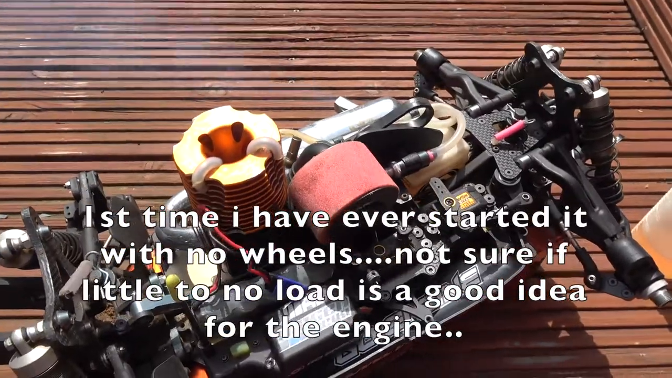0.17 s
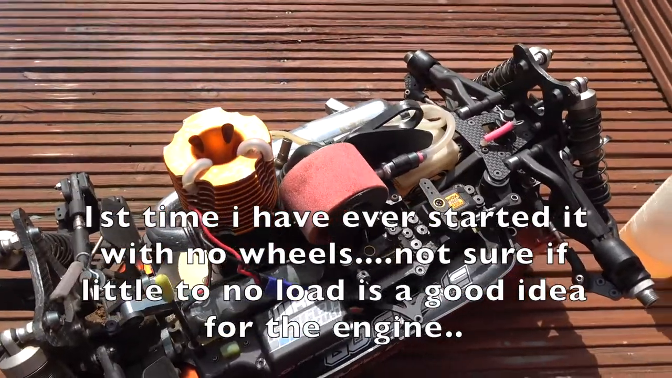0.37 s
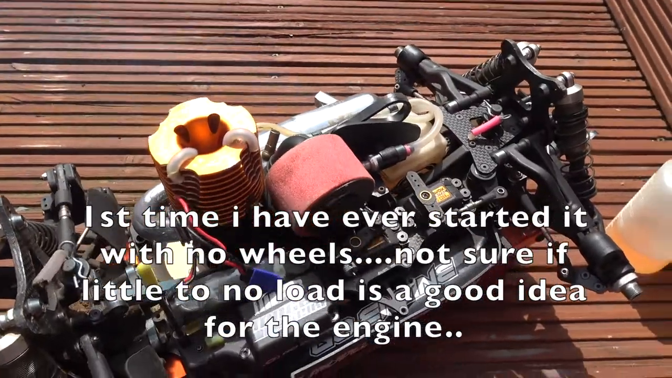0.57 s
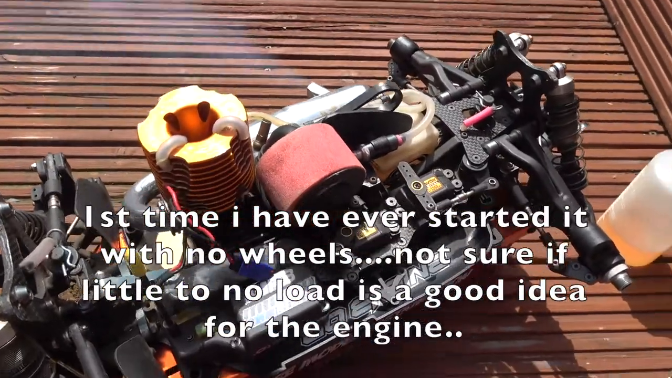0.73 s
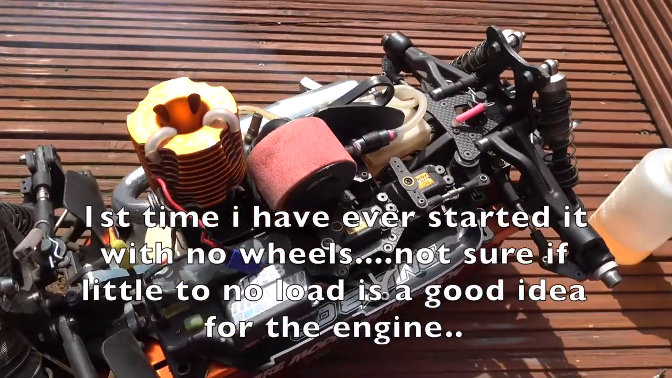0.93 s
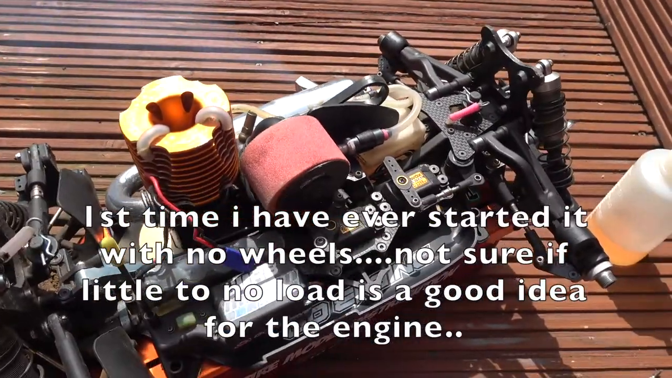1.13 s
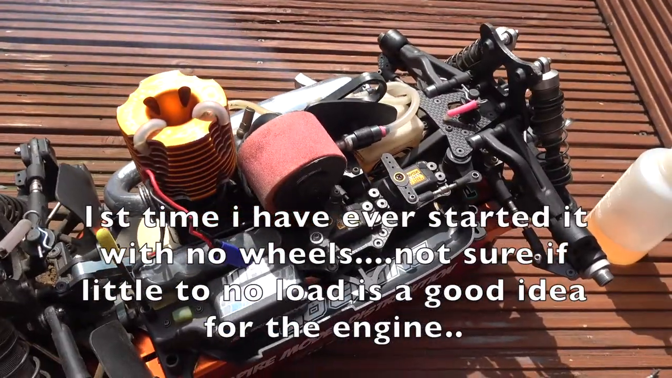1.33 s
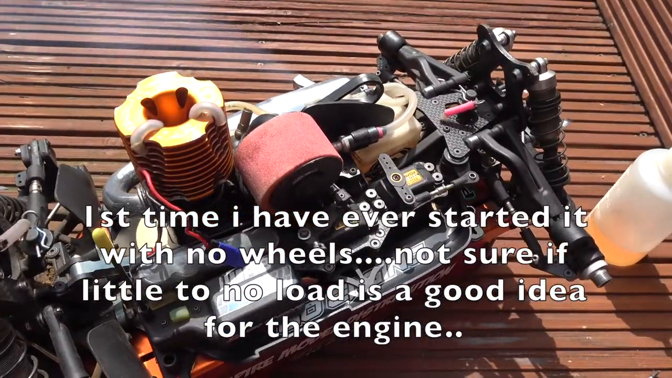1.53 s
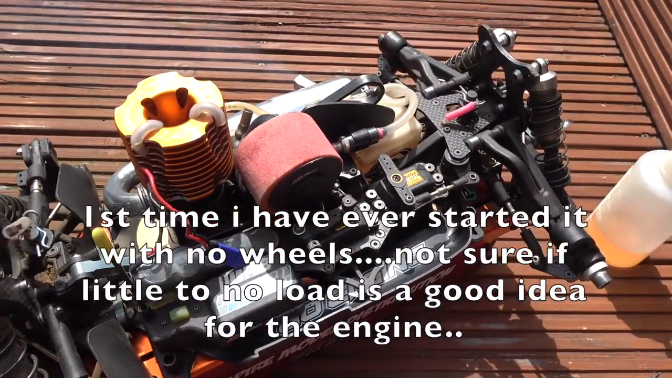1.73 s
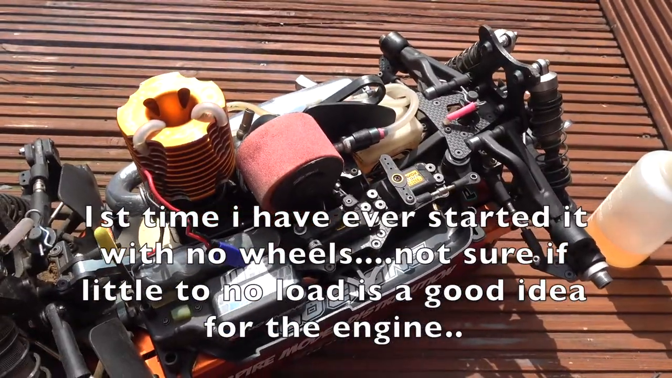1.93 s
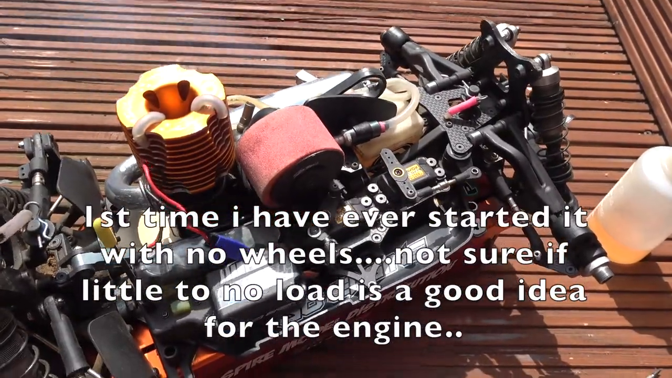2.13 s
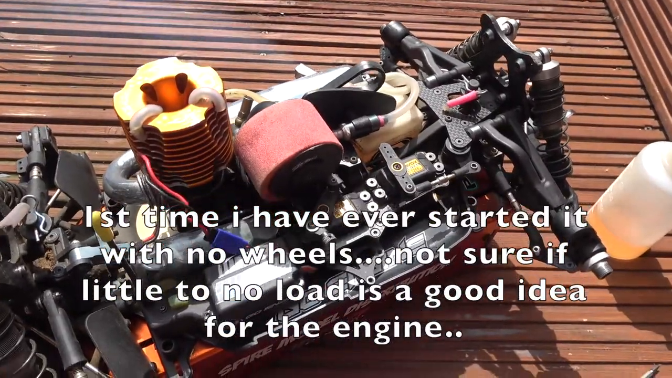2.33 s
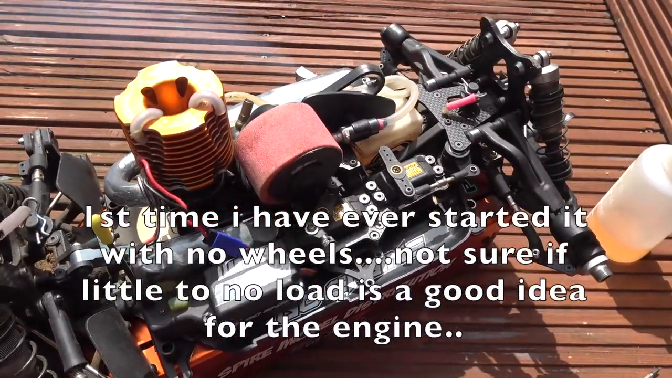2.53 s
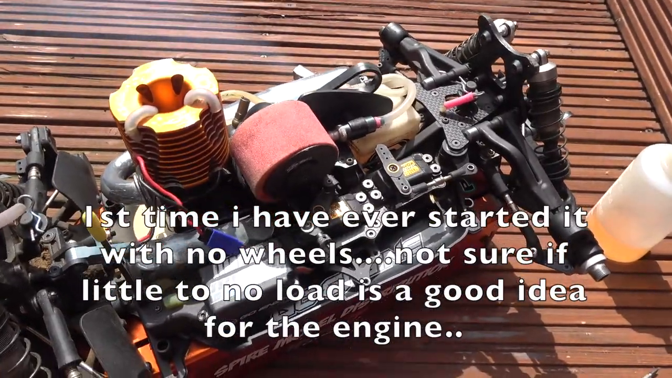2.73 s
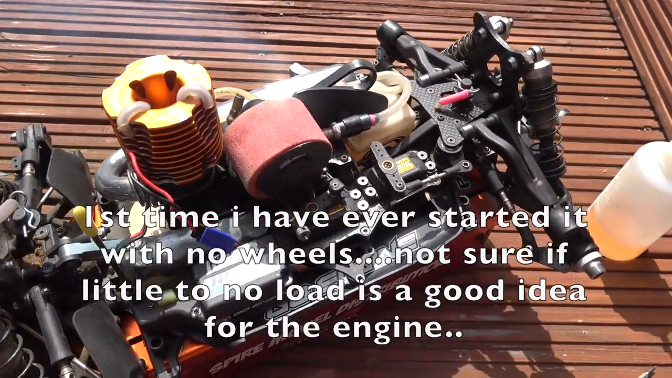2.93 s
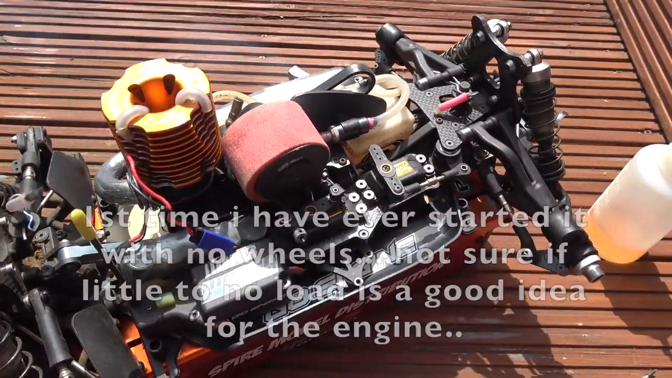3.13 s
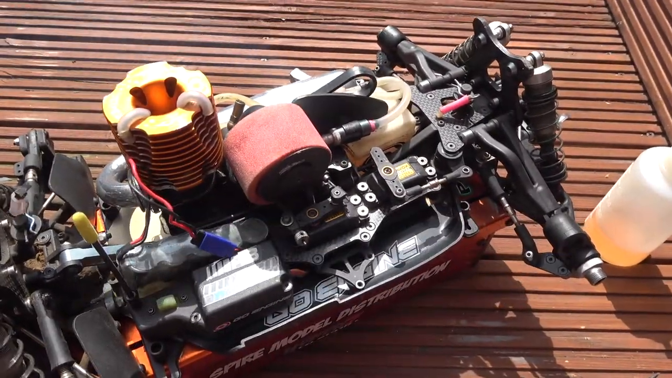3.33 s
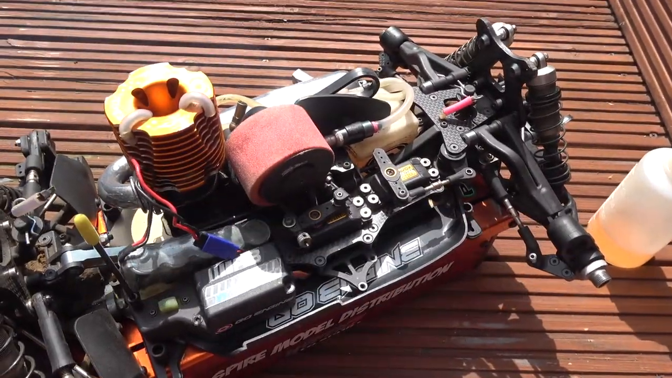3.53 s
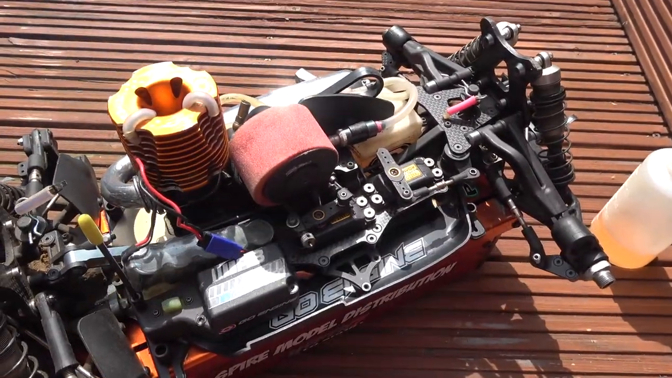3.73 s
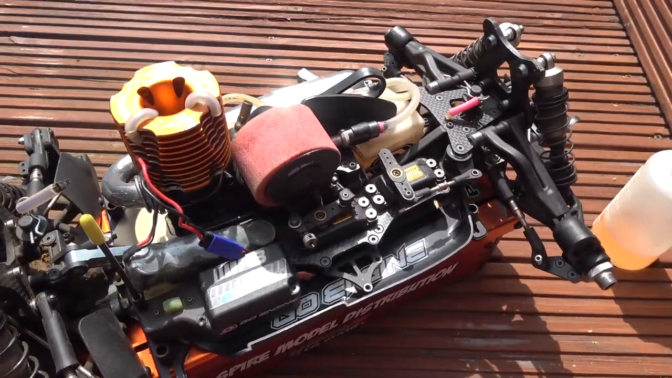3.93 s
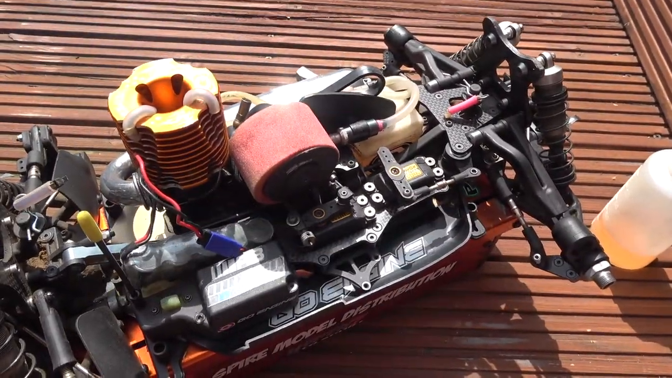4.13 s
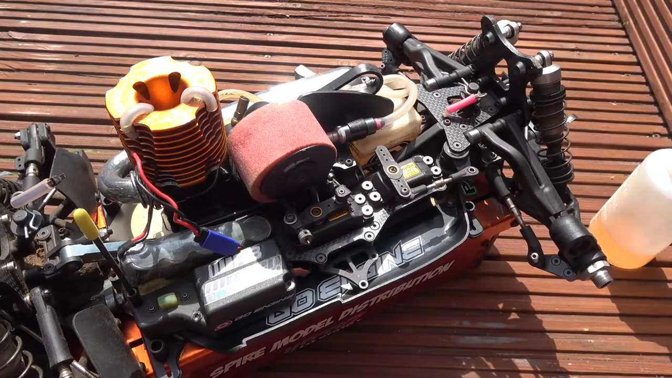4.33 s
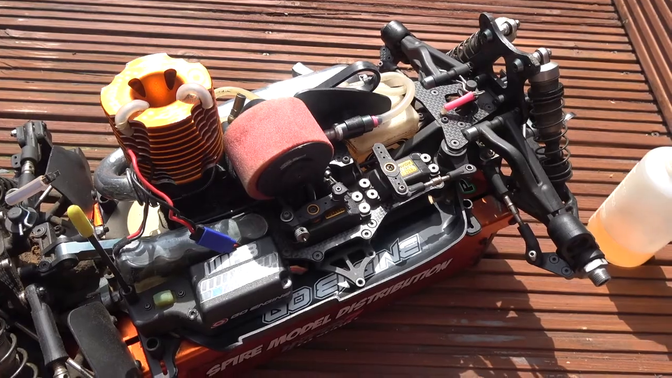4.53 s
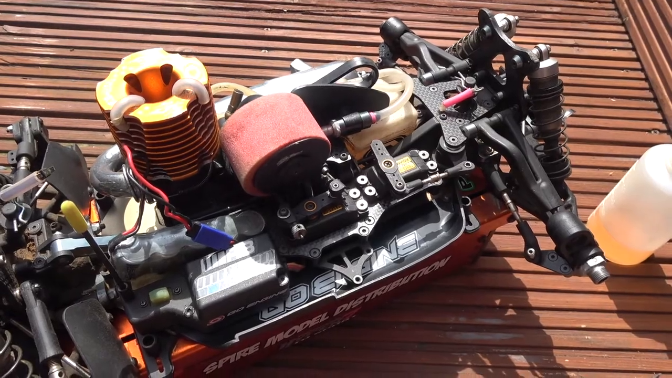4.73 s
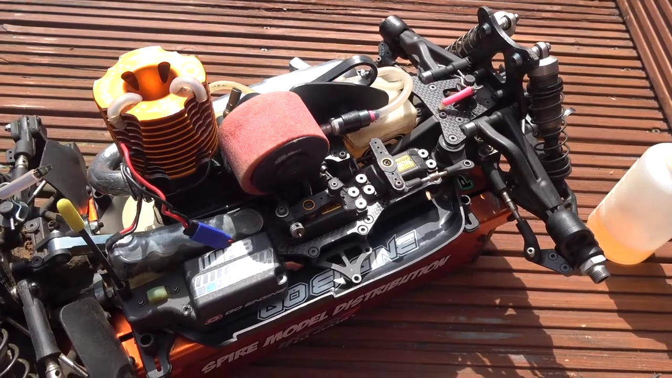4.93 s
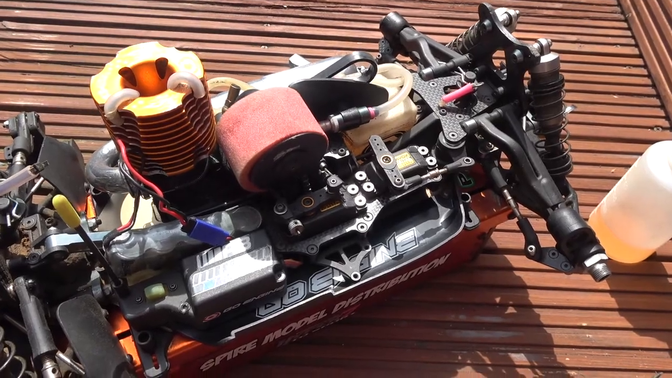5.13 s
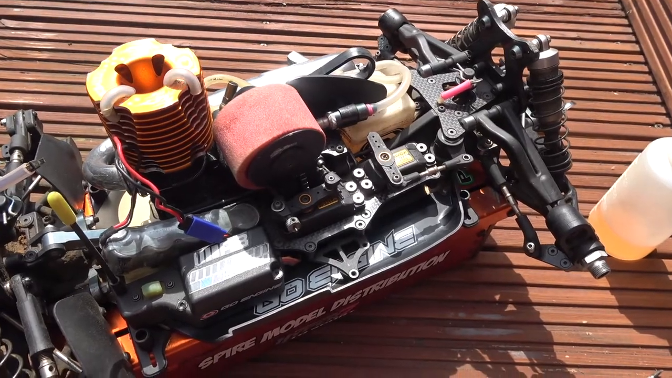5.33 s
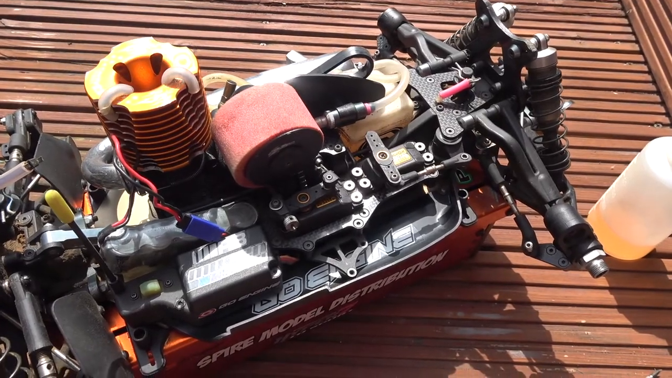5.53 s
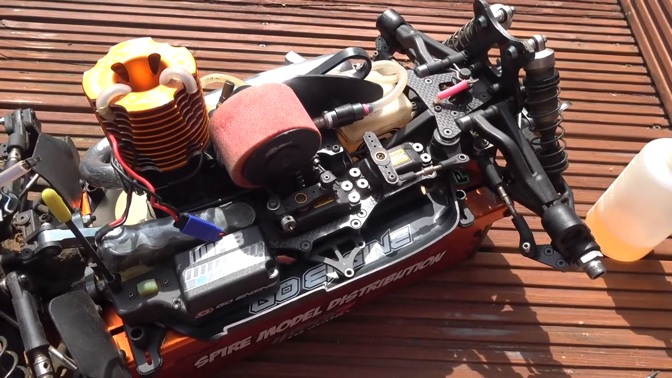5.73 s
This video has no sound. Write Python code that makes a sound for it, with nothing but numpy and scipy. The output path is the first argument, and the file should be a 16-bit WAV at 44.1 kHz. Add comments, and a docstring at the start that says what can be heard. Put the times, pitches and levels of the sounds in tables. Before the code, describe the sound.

Close to the microphone on a wooden deck, a tiny nitro engine in a model car drops from a high, buzzing scream. Twice more it is revved hard, held briefly and allowed to run down, while a loose part rattles lightly. For the last stretch it idles a little to the left, sputtering and crackling irregularly, with a faint high scrape from the clutch and a slight echo.

```python
"""A model buggy's two-stroke nitro engine screams close to a stereo microphone on a wooden deck.
It runs down, takes two more throttle bursts, then idles unevenly, a little to the left. Each crank turn
puffs through the silencer and rings the gas cavities; at speed every other turn is unlike the last.
A loose part rattles and the clutch scrapes; a short echo and a faint tail follow everything.
The microphone's gain control holds the bursts down and slowly lifts the idle."""
import sys
import numpy as np
from scipy import signal
from scipy.fft import rfft, irfft, next_fast_len
from scipy.io import wavfile
from scipy.ndimage import uniform_filter1d

SR = 44100
rng = np.random.default_rng(int(sys.argv[2]) if len(sys.argv) > 2 else 0)


def bounce(signal):
    """Save signal as a 16-bit WAV file at the path given by the first command-line argument."""
    frames = np.transpose(np.atleast_2d(signal))
    limited = np.clip(frames, -1, 1)
    pcm = np.round(limited * 32767).astype(np.int16)
    wavfile.write(sys.argv[1], SR, pcm)


N = 258867
T = np.arange(N) / SR

# the hardest firings at low speed: (time [s], extra ring [dB], extra crack [dB])
HARD_FIRINGS = [(0.6635, 10, 8), (2.126, -2, 12), (3.5916, 6, 6), (3.7142, 12.5, 4), (3.7885, 8, 4.5),
                (3.8359, 14, 5.5), (3.9932, 13.5, 4.5), (4.1916, 13, 0.5), (4.3170, 15, 6.5),
                (4.3539, 11, 3.5), (4.4181, 13, 4), (4.5041, 12.5, 2.5), (4.5916, 11, 2.5),
                (4.647, 11, 2.5), (4.6745, 12, 3.5), (4.7026, 13, 5.5), (4.7893, 14, 3), (4.9011, 11, 2),
                (4.928, 12, -1), (5.031, 10.5, 4), (5.0678, 15, -1), (5.187, 15, 1), (5.2238, 8, 1),
                (5.2427, 14, 3), (5.2704, 11.5, 5), (5.2972, 14, 6), (5.325, 13, 0), (5.3797, 14, 0),
                (5.4532, 14, 1.5), (5.5463, 14, 1), (5.609, 14, 1.5), (5.6457, 10, 1), (5.6831, 11, 4.5),
                (5.7369, 6, 0), (5.7555, 16, 4), (5.7908, 14.5, 2.5), (5.8556, 13.5, 1.5)]
# throttle bursts: (opens [s], closes [s], rattle of a loose part at full speed [dB])
THROTTLE_BURSTS = [(-0.6, 0.169, -26.5), (0.664, 1.594, -31), (2.116, 2.973, -40)]


def crank_speed(rise_s=0.078):
    """Turns per second: each burst shoots up from idle, holds near top speed and runs down again."""
    # crank speed with the throttle wide open: (time [s], speed [Hz])
    top_speed = [(0.02, 559), (0.18, 549.4), (0.85, 589.3), (1.03, 561.4), (1.384, 558.8), (1.418, 563.7),
                 (1.58, 560.4), (2.28, 595), (2.312, 588.4), (2.422, 570.6), (2.608, 559), (2.656, 583.3),
                 (2.74, 572), (2.96, 565.2)]
    # every burst runs down alike: (time since the throttle closed [s], speed [Hz])
    run_down = [(0, 568.5), (0.07, 492.4), (0.144, 350.2), (0.212, 279), (0.266, 235.5), (0.297, 202),
                (0.378, 152.7), (0.46, 118), (0.61, 91.5)]
    # crank speed at idle: (time [s], speed [Hz])
    idle_speed = [(3.55, 94.9), (4.29, 104.5), (4.34, 107.6), (4.46, 103.4), (5.18, 107.6), (5.86, 110.2)]
    idle, top = lookup(T, idle_speed), lookup(T, top_speed)
    hz = idle
    for opens, closes, _ in THROTTLE_BURSTS:
        rise = top - (top - idle) * np.exp(-(np.maximum(T - opens, 0) / rise_s) ** 2)
        fall = lookup(T - closes, run_down, left=np.inf)
        hz = np.maximum(hz, np.minimum(rise, fall))
    return hz


def crank(hz, waver=0.0022):
    """Crank angle in turns, and the whole turn on which each hard firing falls."""
    turns = np.cumsum(hz * (1 + waver * walk(60))) / SR
    hard_times = np.array(HARD_FIRINGS)[:, 0]
    free_turns = np.interp(hard_times, T, turns)
    turns_between = np.maximum(np.round(np.diff(free_turns)), 1)
    fired = np.round(free_turns[0]) + np.append(0, np.cumsum(turns_between))
    return turns + np.interp(T, hard_times, fired - free_turns), fired.astype(int)


def charges(turns, fired, hz, stumble_hz=137, spent_db=-2.5):
    """Time, ring strength and crack strength of every turn; at low speed the engine fires unevenly."""
    times = np.interp(np.arange(int(turns[-1]) + 1), turns, T)
    chance, jitter = rng.standard_normal((N // 50, 2))[:len(times)].T
    burn = unit(chance - .5 * np.roll(chance, 1))  # a good burn tends to be followed by a poor one
    uneven = np.interp(times, T, ramp(stumble_hz - hz, 20))
    ring_db = uneven * (6 + 2 * burn) + .5 * jitter
    crack_db = uneven * (-1.8 + 2.2 * burn) + 0.29 * jitter
    ring_db[fired[fired + 1 < len(times)] + 1] += spent_db  # burnt gas spoils the next charge
    _, ring_db[fired], crack_db[fired] = np.transpose(HARD_FIRINGS)
    return times, undb(ring_db), undb(crack_db)


def path_levels(hz, surge, rasp_knee_hz=389):
    """Boom, ring, pipe and rasp in dB: they follow the speed; all but the ring leap under acceleration."""
    # the silencer booms most at speed and again near its own resonance: (speed [Hz], level [dB])
    boom_by_speed = [(100, -42), (112, -39), (150, -39), (240, -23), (268, -26), (295, -32.5), (350, -23.5),
                     (420, -16), (560, -15)]
    # the tuned pipe comes on with speed: (speed [Hz], level [dB])
    pipe_by_speed = [(98, -47), (110, -39.5), (150, -54), (240, -30), (280, -25), (400, -20.5), (460, -48),
                     (510, -17), (555, -15.5), (590, -8)]
    slack_db = 21.5 * (surge - 1)  # zero under hard acceleration
    boom_db = np.maximum(lookup(hz, boom_by_speed) - 5.5 * surge, -29 + slack_db)
    ring_db = -36.5 + 5 * np.log2(hz / 100)
    pipe_db = np.maximum(lookup(hz, pipe_by_speed), -22 + slack_db)
    steady_rasp_db = -14.5 + 12.5 * np.minimum(np.log2(hz / rasp_knee_hz), 0)
    return boom_db, ring_db, pipe_db, np.maximum(steady_rasp_db, -17.5 + slack_db)


def puffs(path, times, sizes):
    """Pulses through one path, scaled so that even pulses have an rms of one."""
    even = path(clicks(times, np.ones(len(times))))
    return path(clicks(times, sizes)) / running_rms(even, 0.044)


def scream(turns, flutter_turns=0.0022, wander_db=2.0, shimmer_db=1.5):
    """Clean harmonics of the crank; half orders come from a strong-weak pattern of firings."""
    # full-throttle partials: (order [multiples of the crank speed], level [dB])
    partials = [(.5, -21), (1.5, -13), (2, -1), (2.5, -19.5), (3, -11), (3.5, -5.5), (4.5, -21), (5, -6.5),
                (6, -3.5), (6.5, -18), (7, -3.5), (7.5, -4.5), (8, -2), (8.5, -19), (9, -14), (9.5, -14.5),
                (10, -6), (10.5, -10.5), (11, -11), (11.5, -17), (12, -7.5), (12.5, -10), (13, -8.5),
                (13.5, -11.5), (14, -23), (14.5, -10), (15, -13)]
    angle = 2 * np.pi * (turns + flutter_turns * walk(350))
    tone = 0
    for order, db in partials:
        level = undb(db + wander_db * walk(8.9) + shimmer_db * walk(70))
        tone = tone + level * np.sin(order * angle + 2 * np.pi * rng.random())
    return np.sqrt(2) * tone


def tuned_pipe(x, hz=2230, width_hz=170, skirt_hz=800):
    """The pipe's resonance, which the fourth harmonic meets at full speed."""
    return resonate(resonate(x, hz, width_hz), hz, skirt_hz)


def silencer(x, band_hz=(85, 640)):
    """The silencer's low resonances; little above them gets out."""
    # gas resonances: (frequency [Hz], width [Hz], level [dB])
    modes = [(121, 53, -39), (197, 93, 7.5), (311, 26, -1.5), (429.4, 69, 8.5)]
    boom = sum(undb(db) * resonate(x, hz, width) for hz, width, db in modes)
    return butterworth(boom, 4, band_hz, "band")


def port_gas(turns, hz, times, sizes, crack_db, decay_turns, leak):
    """The port opens with a crack, and gas hisses out and fades during the turn."""
    strength = sizes[np.clip(turns.astype(int), 0, len(sizes) - 1)]
    flow = unit(np.exp(-(turns % 1) / decay_turns) + leak)
    hiss = flow * strength * rng.standard_normal(N)
    crack = delay(clicks(times, sizes)) * np.sqrt(SR / hz)
    gas = (hiss + undb(crack_db) * crack) / np.sqrt(1 + undb(crack_db) ** 2)
    return butterworth(gas, 2, 110, "high")


def rasp(turns, hz, times, crack, full, slow):
    """Escaping gas: bright and crackling at speed, duller and mostly hiss at idle."""
    # gas colour at speed: (frequency [Hz], level [dB])
    fast_colour = [(60, -23), (250, -17.5), (450, -7.5), (700, -14.5), (950, 0.5), (1400, -14.5), (1700, 0),
                   (2000, 3), (3300, 3.5), (4300, 1), (5000, -1.5), (7200, -1), (8500, -5.5), (13000, -10),
                   (15000, -17)]
    # gas colour at idle: (frequency [Hz], level [dB])
    idle_colour = [(60, -2), (250, -4.5), (450, 8), (660, -1), (900, 6), (1700, 6), (2700, 2.5), (3100, -1),
                   (3700, -1), (5500, -7.5), (6500, -14), (7100, -7), (8200, -14), (15000, -27)]
    fast_gas = port_gas(turns, hz, times, crack, crack_db=1 - full, decay_turns=.59, leak=1)
    idle_gas = port_gas(turns, hz, times, crack ** .6, crack_db=-9, decay_turns=.6, leak=.4)
    fast = undb(-2.5 - 1.4 * full) * np.sqrt(1 - slow) * voiced(fast_gas, fast_colour)
    return fast + undb(-3.5) * np.sqrt(slow) * voiced(idle_gas, idle_colour)


def crankcase(x, hz=1280, length_s=.0038):
    """The gas in the crankcase rings while the port is open: a ping that swells and dies in five cycles."""
    t = T[T < length_s]
    ping = np.sin(np.pi * t / length_s) ** 2 * np.sin(2 * np.pi * hz * t)
    return np.convolve(x, ping)[:N]


def intake(x, hz=920, width_hz=330):
    """The open carburettor honks."""
    return resonate(resonate(x, hz, width_hz), hz, width_hz)


def snaps(times, fired, crack, decay_s=.0022, tail_s=.007, tail_db=-13):
    """Only a hard firing still has pressure left when the port opens: a bright snap with a short tail."""
    # colour of the snap: (frequency [Hz], level [dB])
    snap_colour = [(60, -45), (200, -33), (900, -12), (2200, 11.5), (3100, -3), (5500, 4), (7400, -7),
                   (8500, -21), (15000, -34)]
    t = T[:SR // 20]
    fade = np.exp(-t / decay_s) + undb(tail_db) * np.exp(-t / tail_s)
    envelope = signal.fftconvolve(clicks(times[fired], crack[fired] ** 2), fade)[:N]
    return envelope * voiced(rng.standard_normal(N), snap_colour)


def rattle(times, hz, full, surge, build_s=0.18, stop_hz=162.8, scatter_db=3):
    """A loose part strikes the chassis on every second turn, at speed and on the way down."""
    shake = undb(-25.5) * (1 - full) * (1 - surge) * ramp(hz - stop_hz, 70.25)  # on each run-down
    for opens, closes, db in THROTTLE_BURSTS:
        held = (T > opens + build_s) & (T < closes)
        shake = shake + undb(db) * uniform_filter1d(held * 1., size=SR // 10)
    strikes = times[::2]
    sizes = undb(scatter_db * rng.standard_normal(N // 100)[:len(strikes)])
    return puffs(chassis, strikes, sizes) * shake


def chassis(x, modes_hz=(3400, 4240), width_hz=260):
    """Two ringing modes of the chassis plate."""
    low, high = (resonate(resonate(x, hz, width_hz), hz, 8 * width_hz) for hz in modes_hz)
    return undb(-3) * low + high


def fins(times, sizes, hz, width_hz):
    """The cooling fins sing when a high harmonic meets them."""
    return unit(resonate(clicks(times, sizes), hz, width_hz))


def clutch(hz, surge, brush_hz=155, brush_width_hz=35.6, fade_s=0.048, flicker_db=4.0):
    """The shoes rub unevenly and ring the steel clutch bell, late in each run-down and twice at idle."""
    # clutch bell resonances: (frequency [Hz], width [Hz], level [dB])
    modes = [(9462, 299, -1), (12017, 370, -15), (13600, 400, -9)]
    # scrapes at idle: (start [s], length [s], level [dB])
    scrapes = [(4.89, 0.055, -58), (5.155, 0.8, -54)]
    contact = undb(-41) * np.exp(-((hz - brush_hz) / brush_width_hz) ** 2) * (1 - surge)
    for start, length, db in scrapes:
        inside_s = np.minimum(T - start, start + length - T)
        contact = contact + undb(db) * ramp(inside_s + fade_s / 2, fade_s)
    rub = rng.standard_normal(N) * undb(flicker_db * walk(130))
    bell = sum(undb(db) * resonate(resonate(rub, f, width), f, 4 * width) for f, width, db in modes)
    return unit(bell) * contact


def draught(hz, full, gust_db=2.5, db_per_hz=0.26):
    """At full throttle the exhaust stream buffets the microphone, harder as the revs overshoot."""
    air = butterworth(rng.standard_normal(N), 2, [45, 170], "band")
    return unit(air) * full * undb(-57 + db_per_hz * (hz - 555) + gust_db * walk(25))


def stereo_echoes(x):
    """A short echo and a faint tail, the same in both channels; the high treble is spread wider."""
    # balance of the microphone pair: (frequency [Hz], left minus right [dB])
    balance = [(60, 1.5), (160, 3.5), (330, 2.3), (560, 4.8), (1100, 4.4), (1330, 1.3), (1680, 5),
               (1950, .8), (4000, .5), (6700, 2), (8000, .9), (15000, .8)]
    echo = undb(-10) * reflections(x, t60_s=0.051, above_hz=1700)
    echo += undb(-20) * reflections(x, t60_s=0.64, above_hz=1250)
    wide_treble = [undb(-7) * reflections(x, t60_s=.02, above_hz=5800) for _ in range(2)]
    pair = [colour(x + echo, [(f, side * db / 2) for f, db in balance]) for side in (1, -1)]
    return np.array(pair) + wide_treble


def reflections(x, t60_s, above_hz):
    """A dense tail of echoes as strong as its source, for waves short enough to be scattered."""
    t = T[:SR // 2]
    tail = rng.standard_normal(len(t)) * undb(-60 * t / t60_s) * (t > .002)
    scattered = butterworth(x, 3, above_hz, "high")
    return signal.fftconvolve(scattered, tail / np.linalg.norm(tail))[:N]


def undb(db):
    """Decibels to gain."""
    return 10 ** (np.asarray(db) / 20)


def unit(x):
    """Scale to an rms of one."""
    return x / np.sqrt(np.mean(x ** 2))


def ramp(x, span):
    """Rise from zero to one as x goes from zero to span."""
    return np.clip(x / span, 0, 1)


def lookup(x, table, left=None):
    """Read a two-column table along straight lines."""
    return np.interp(x, *np.transpose(table), left=left)


def walk(per_s):
    """Random levels joined by slopes, with an rms of one."""
    levels = rng.standard_normal(N // 50)
    return unit(np.interp(T * per_s + rng.random(), np.arange(len(levels)), levels))


def running_rms(x, seconds):
    """Loudness under a smooth window."""
    window = np.hanning(int(seconds * SR) | 1)
    energy = np.abs(signal.fftconvolve(x ** 2, window, "same"))
    return np.sqrt(energy / signal.fftconvolve(np.ones(N), window, "same") + 1e-14)


def clicks(times, sizes):
    """Band-limited clicks at exact times."""
    taps = (times * SR).astype(int)[:, None] + np.arange(-7, 9)
    offset = taps - times[:, None] * SR
    shape = np.sinc(offset) * np.cos(np.pi * offset / 16) ** 2
    inside = (taps >= 0) & (taps < N)
    return np.bincount(taps[inside], (sizes[:, None] * shape)[inside], N)


def delay(x, samples=89):
    """Short trips through pipe and chassis hold a click back without colouring it."""
    return np.pad(x, (samples, 0))[:N]


def resonate(x, hz, width_hz):
    """One resonance, gain one at its centre."""
    return signal.lfilter(*signal.iirpeak(hz, hz / width_hz, SR), x)


def butterworth(x, order, edge_hz, kind):
    """A filter with a flat passband."""
    return signal.sosfilt(signal.butter(order, edge_hz, kind, fs=SR, output="sos"), x)


def colour(x, points):
    """Filter by (frequency [Hz], level [dB]) points."""
    size = next_fast_len(N + SR // 10)
    hz, db = np.transpose(points)
    bins = np.arange(size // 2 + 1) * SR / size
    gain = undb(np.interp(np.log(bins + 1), np.log(hz), db))
    return irfft(rfft(x, size) * gain, size)[:N]


def voiced(x, points):
    """Colour a white source so that its 2.6-8 kHz band has the rms of the whole input."""
    hz, db = np.transpose(points)
    band = np.arange(2600, 8000, 50)
    gain = undb(np.interp(np.log(band), np.log(hz), db))
    power = np.mean(gain ** 2) * np.ptp(band) / (SR / 2)
    return colour(x, points) / np.sqrt(power)


def scene():
    """All paths of the engine at close range, a little louder in the left microphone."""
    hz = crank_speed()
    slow, full = ramp(230 - hz, 90), ramp(hz - 470, 75)  # one at idle; one at full speed
    acceleration = uniform_filter1d(np.gradient(hz) * SR, size=600)  # Hz per second
    surge = ramp(acceleration, 3900)
    boom_db, ring_db, pipe_db, rasp_db = path_levels(hz, surge)
    turns, fired = crank(hz)
    times, ring, crack = charges(turns, fired, hz)
    engine = undb(boom_db) * puffs(silencer, times, ring ** .25)
    engine += (1 - full) * undb(ring_db) * puffs(crankcase, times, ring ** .75)
    engine += undb(pipe_db) * puffs(tuned_pipe, times, crack)
    honk = undb(-18) * surge * ramp(hz - 120, 330) + undb(-46) * slow
    engine += honk * puffs(intake, times, crack)
    regular_burn = ramp(hz - 507, 40.6)  # brings clean harmonics at full speed
    engine += regular_burn * undb(rasp_db - 7) * scream(turns)
    engine += undb(rasp_db) * rasp(turns, hz, times, crack, full, slow)
    engine += undb(-45) * snaps(times, fired, crack)
    engine += rattle(times, hz, full, surge)
    zing = undb(-22.5) * np.sqrt(surge) * ramp(hz - 420, 80)  # as the revs shoot up
    engine += zing * fins(times, crack, hz=7520, width_hz=110)
    engine += undb(rasp_db - 20) * fins(times, crack, hz=10620, width_hz=70)
    engine += clutch(hz, surge) + draught(hz, full)
    return stereo_echoes(engine)


def record(dry, ceiling_db=-12.5, release_db_per_s=4.0, window_s=0.19, top_hz=15750):
    """The microphone's gain control ducks at once and recovers slowly; the top treble is cut."""
    allowed_db = ceiling_db - 20 * np.log10(running_rms(dry.mean(axis=0), window_s))
    recovery_db = release_db_per_s * T
    gain_db = recovery_db + np.minimum.accumulate(allowed_db - recovery_db)
    return signal.sosfilt(signal.ellip(10, .2, 80, top_hz, fs=SR, output="sos"), dry * undb(gain_db))


dry = scene()
out = record(dry)
bounce(out)
```